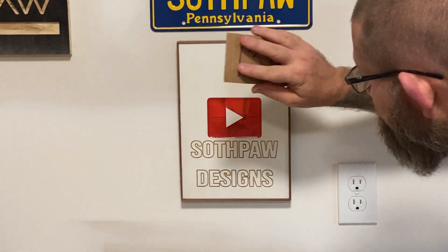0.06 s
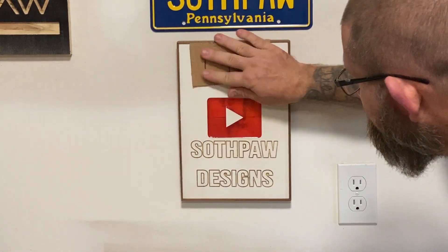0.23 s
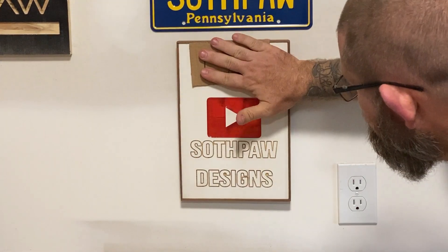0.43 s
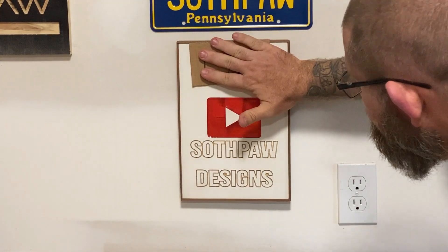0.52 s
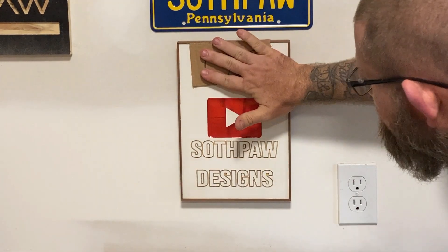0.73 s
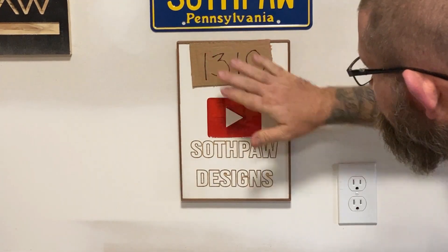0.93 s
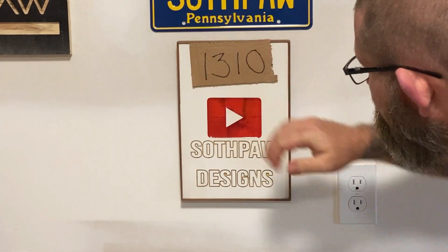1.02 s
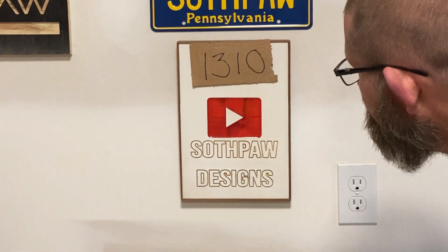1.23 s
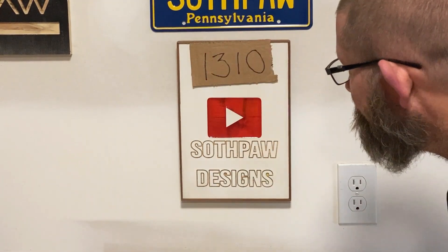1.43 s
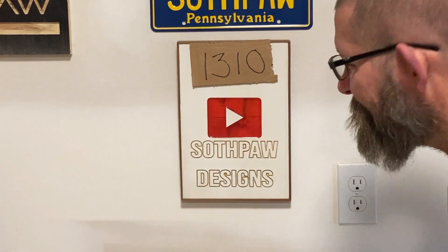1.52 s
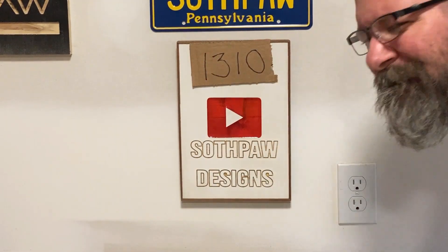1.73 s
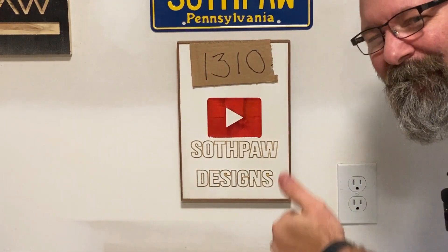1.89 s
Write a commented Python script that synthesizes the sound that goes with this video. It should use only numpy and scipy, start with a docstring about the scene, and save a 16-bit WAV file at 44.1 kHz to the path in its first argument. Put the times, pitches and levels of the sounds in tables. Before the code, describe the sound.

A hand slaps cardboard onto a wall sign at about 0.25 seconds: a sharp, crackly clap with a low thump from the hollow wall and a slight ring, fading by one second. At about 1.3 seconds a weaker, duller wooden knock sounds nearby, with faint rustling. Two very light taps come near 1.9 seconds. The small room adds a short echo and a quiet low rumble.

```python
"""A hand slaps a scrap of cardboard onto a sign on a hollow wall, in a small live room.
The card crackles flat, trapped air claps, the sign rings and the wall booms under the palm.
The hand slides off; a duller, wooden knock follows nearby, then faint rustling and two light taps.
A closely spaced pair of microphones hears it all, with the room's reflections and low rumble."""
import sys
import numpy as np
from scipy import signal
from scipy.fft import rfft, irfft
from scipy.io import wavfile

SR = 44100
rng = np.random.default_rng(int(sys.argv[2]) if len(sys.argv) > 2 else 0)


def persist_wave(psi):
    """Save psi, clipped to +-1, as 16-bit WAV."""
    counts = np.round(np.clip(psi, -1, 1) * 32767).astype(np.int16)
    wavfile.write(sys.argv[1], SR, np.atleast_2d(counts).T)


N = 85995

# card landing on the sign: start_s, level_db, decay_s
CARD_CONTACTS = [(0.2127, -24, .018), (0.2446, 3, .0115), (0.2623, -0.5, 0.0027), (0.2863, 2.5, 0.0028)]
# the card's crackle: frequency_hz, relative_db
CARD_SPECTRUM = [(100, -15), (260, -3.5), (430, -1.5), (560, -2.5), (830, -14), (1150, 2.5), (1550, -1),
                 (2200, 2), (3400, -6), (5000, -9.5), (7000, -14), (11000, -14), (15000, -15)]
# air squeezed from under the card: frequency_hz, relative_db
CLAP_SPECTRUM = [(100, -25), (500, -7.5), (800, -7.5), (1200, 2), (2000, -4.5), (3200, -12.5), (6000, -29),
                 (16000, -47)]
# resonances of the sign: pitch_hz, level_db, t60_s
SIGN_MODES = [(356.1, -41, 0.65), (481.3, -33.5, 0.59), (983, -36.5, 0.17), (1127.4, -31.5, 0.67),
              (1160, -35, 0.42), (1160, -32, 0.38), (1314, -35, 0.18), (1390, -35, 0.19), (1573, -39.5, .5),
              (1930, -38, 0.69)]
# fingers, palm, the hand settling, then soft low bumps: start_s, level_db, push_s
LOW_PUSHES = [(.248, -22, 0.0016), (.2625, -4, 0.0023), (.2895, 5, 0.0049), (.405, -20.5, 0.011),
              (.497, -14, 0.016), (.62, -21.5, 0.0137), (.86, -37, 0.0114), (1.15, -40, 0.0062)]
# resonances of the hollow wall: pitch_hz, level_db, t60_s
WALL_MODES = [(43, -25, .52), (58.3, -24, 0.36), (76.5, -19.5, 0.31), (101.5, -24, .18), (124, -16.5, 0.14),
              (151.7, -16, 0.13), (169.5, -23.5, 0.37), (198, -22, 0.15), (240.5, -21, 0.23)]
# the knock and its lead-in: start_s, level_db, push_s
KNOCK_PUSHES = [(1.3158, -8.5, 0.00087), (1.3208, -9.5, 0.00083), (1.3232, 0.5, 0.00066)]
# resonances of the knocked wood: pitch_hz, level_db, t60_s
WOOD_MODES = [(236, -34, 0.38), (383, -27, 0.057), (404, -46, .18), (441, -26, 0.069), (572.5, -37, 0.14),
              (997.6, -35.5, 0.08), (1303, -38, 0.064), (1700, -38, 0.06)]
# scuff of each contact on the wood: frequency_hz, relative_db
SCUFF_SPECTRUM = [(100, -44), (400, -9), (750, 16.5), (1400, 11), (2200, 6.5), (3500, -14), (7000, -16.5),
                  (16000, -27)]
# bass swelling after the knock: frequency_hz, relative_db
BLOOM_SPECTRUM = [(25, -22), (65, 7), (100, -3), (190, -7), (240, 0.5), (290, -18.5), (500, -31),
                  (16000, -80)]
# faint taps at the end: start_s, level_db, push_s
TAP_PUSHES = [(1.862, -2, 0.00057), (1.915, -5, 0.00033)]
# resonances under the taps: pitch_hz, level_db, t60_s
TAP_RING_MODES = [(843, -59.5, 0.11), (1034, -69.5, 0.074), (1890, -62, .08)]
# strokes of skin and cloth: peak_s, level_db, rise_s, hold_s, release_s, low_cut_hz
RUB_STROKES = [(0.167, -71.5, 0.016, 0.06, 0.015, 1020), (0.218, -49, 0.021, 0.028, .01, 704),
               (.435, -60.5, 0.016, 0.012, 0.019, 6000), (0.728, -63, 0.049, 0.082, 0.047, 2625),
               (1.326, -55.5, 0.01434, 0.072, 0.072, 600), (1.562, -65, 0.011, 0.0094, 0.086, 900),
               (1.86, -76.5, .1, 0.081, .05, 902.3)]
# their friction: frequency_hz, relative_db
RUB_SPECTRUM = [(200, -6), (800, 0), (2300, 1.5), (3500, -4.5), (5500, -5), (8000, -11), (11000, -8),
                (15000, -8.5)]
# the room at the microphones: frequency_hz, t60_s, left_right_likeness (-1 to 1)
ROOM_BANDS = [(60.4, 0.36, 1), (199, 0.52, .88), (520, 0.68, 0.8), (1100, 0.6, 0.12), (2070, 0.58, 0.64),
              (4580, 0.47, 0.59), (8100, 0.43, -.2), (15295, 0.2, 0)]
# room tone: frequency_hz, relative_db
RUMBLE_SPECTRUM = [(20, -8), (42, 1.5), (80, -2.5), (135, -5.5), (220, -16.5), (350, -24), (540, -20.5),
                   (900, -36), (3000, -40.5), (8000, -42.5), (16000, -46.5)]
# dips in the microphones' treble: centre_hz, width_hz
MIC_TREBLE_DIPS = [(8600, 700), (12350, 5400)]


def cardboard(rise_s=0.0012, soften_s=0.01, pressed_top_hz=3130):
    """Each contact is a burst of crackle, duller once the card is pressed down."""
    bursts = sum(amp(db) * burst(start, rise_s, decay) for start, db, decay in CARD_CONTACTS)
    crackle = amp(-16) * colour(bursts * grainy(0.28), CARD_SPECTRUM)
    pressed = signal.sosfilt(signal.butter(2, pressed_top_hz, fs=SR, output="sos"), crackle)
    landing_s = CARD_CONTACTS[1][0]
    loose = np.exp(-(since(landing_s) / soften_s) ** 2)
    return loose * crackle + (1 - loose) * pressed


def air_clap(collapse):
    """The air pocket under the card collapses in one crack."""
    return amp(5) * colour(collapse, CLAP_SPECTRUM)


def ringing_sign(collapse, crackle):
    """The collapsing pocket strikes the sign, and the crackle shakes it lightly."""
    return ring(collapse + amp(-30.5) * crackle, SIGN_MODES)


def wall_boom():
    """The hand lands and settles, driving the hollow wall's low modes; two soft low bumps follow."""
    return ring(blows(LOW_PUSHES), WALL_MODES)


def wood_knock(scuff_decay_s=0.0041, bloom_peak_s=0.043):
    """Nearby, a short stumble of contacts on hollow wood, each with a scuff; the bass swells late."""
    bursts = sum(amp(db) * burst(start, push, scuff_decay_s) for start, db, push in KNOCK_PUSHES)
    scuffs = amp(-34.5) * colour(bursts * rng.standard_normal(N), SCUFF_SPECTRUM)
    age = since(KNOCK_PUSHES[-1][0]) / bloom_peak_s
    swell = age * np.exp(1 - age)
    bloom = amp(-46.5) * swell * colour(rng.standard_normal(N), BLOOM_SPECTRUM)
    return ring(blows(KNOCK_PUSHES), WOOD_MODES) + scuffs + bloom


def faint_taps():
    """Two light blows, each ringing briefly."""
    return ring(blows(TAP_PUSHES), TAP_RING_MODES)


def rubbing():
    """Soft swells of friction as hand and sleeve move, each with its own low cut."""
    friction = colour(grainy(0.19), RUB_SPECTRUM)
    strokes = np.zeros(N)
    for peak, db, rise, hold, release, low_cut_hz in RUB_STROKES:
        swell = np.interp(since(0), [peak - rise, peak, peak + hold, peak + hold + release], [0, 1, 1, 0])
        thinned = signal.lfilter(*signal.butter(1, low_cut_hz, "high", fs=SR), friction)
        strokes += amp(db) * swell * thinned
    return strokes


def room_response(gap_s=0.001, build_s=0.0027):
    """The small room's dense reflections build quickly and die sooner in the treble."""
    hz, t, spectra = signal.stft(diffuse(), SR, nperseg=512)
    decay = np.exp(-np.log(1000) * t / along(ROOM_BANDS, hz)[:, None])
    tail = signal.istft(spectra * decay, SR)[1][:, :N]
    tail *= 1 - np.exp(-since(gap_s) / build_s)
    return tail / np.sqrt(np.sum(tail ** 2) / 2)


def room_rumble():
    """Steady, low room tone from all around the microphones."""
    return amp(-62.5) * colour(diffuse(), RUMBLE_SPECTRUM)


def diffuse():
    """Noise arriving from all sides at two closely spaced microphones."""
    likeness = along(ROOM_BANDS, np.fft.rfftfreq(N, 1 / SR), column=2).clip(-0.98, 0.98)
    mid, side = rfft(rng.standard_normal((2, N)))
    mid *= np.sqrt((1 + likeness) / 2)
    side *= np.sqrt((1 - likeness) / 2)
    return irfft(np.array([mid + side, mid - side]), N)


def grainy(unevenness, grain_samples=24):
    """Noise made of tiny grains of uneven strength."""
    noise = rng.standard_normal(N)
    strengths = rng.standard_normal(N // grain_samples + 1).clip(-2, 2)
    noise *= np.exp(unevenness * np.repeat(strengths, grain_samples)[:N])
    return noise / noise.std()


def blows(pushes):
    """Half-sine pushes whose level sets their total impulse: the longer, the duller."""
    force = np.zeros(N)
    for start, db, length in pushes:
        push = np.sin(np.pi * np.minimum(since(start) / length, 1))
        force += amp(db) * push / push.sum()
    return force


def ring(force, modes):
    """Drive a set of decaying modes; their velocity radiates."""
    t = since(0)
    response = sum(amp(db) * np.cos(2 * np.pi * hz * t) * np.exp(-np.log(1000) * t / t60)
                   for hz, db, t60 in modes)
    return convolve(force, response)


def burst(start, rise, decay):
    """Envelope that rises from a moment and dies away."""
    return (1 - np.exp(-since(start) / rise)) * np.exp(-since(start) / decay)


def colour(x, spectrum, size=8192):
    """Causal filter of unit energy with the given spectrum."""
    gains = amp(along(spectrum, np.fft.rfftfreq(size, 1 / SR)))
    cepstrum = irfft(np.log(gains))
    cepstrum[1:size // 2] *= 2  # fold to minimum phase
    cepstrum[size // 2 + 1:] = 0
    response = irfft(np.exp(rfft(cepstrum)))
    return convolve(x, response / np.linalg.norm(response))


def convolve(x, response):
    """Pass a sound through a response."""
    return irfft(rfft(x, 2 * N) * rfft(response, 2 * N))[..., :N]


def along(table, hz, column=1):
    """Read a column of a table on a log-frequency axis."""
    rows = np.array(table, float)
    return np.interp(np.log(hz + 1), np.log(rows[:, 0]), rows[:, column])


def since(start):
    """Seconds since a moment, zero before it."""
    return np.maximum(np.arange(N) / SR - start, 0)


def amp(db):
    """Decibels to gain."""
    return 10 ** (np.asarray(db) / 20)


def scene(clap_s=0.2587):
    """Direct sound in the centre; all but the sign also reach the microphones by way of the room."""
    card = cardboard()
    collapse = signal.unit_impulse(N, int(clap_s * SR))
    sources = [  # sound, room_send_db
        (card, -2), (air_clap(collapse), 2.5), (wall_boom(), -4),
        (wood_knock() + faint_taps(), -3.5), (rubbing(), -7.5)]
    direct = ringing_sign(collapse, card) + sum(sound for sound, _ in sources)
    into_room = sum(amp(send_db) * sound for sound, send_db in sources)
    return direct + convolve(into_room, room_response()) + room_rumble()


def record(dry, low_cut_hz=26, top_hz=15700):
    """The microphones thin the deepest bass and have two treble dips; the recorder cuts the top."""
    x = signal.sosfilt(signal.butter(2, low_cut_hz, "high", fs=SR, output="sos"), dry)
    for hz, width in MIC_TREBLE_DIPS:
        x = signal.lfilter(*signal.iirnotch(hz, hz / width, fs=SR), x)
    return signal.sosfilt(signal.ellip(12, 0.2, 90, top_hz, fs=SR, output="sos"), x)


dry = scene()
out = record(dry)
persist_wave(out)
```